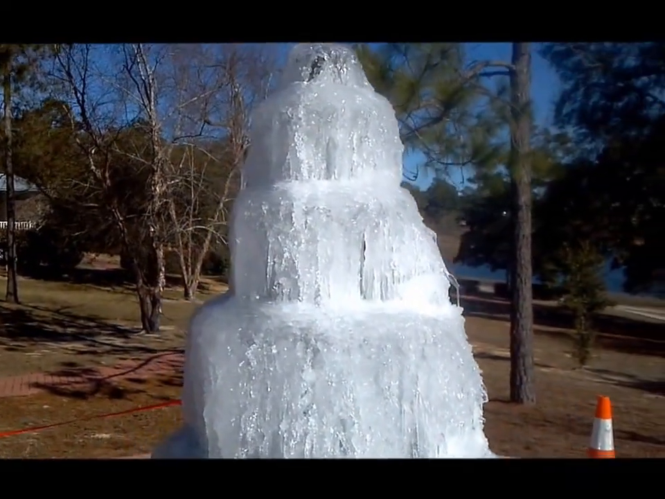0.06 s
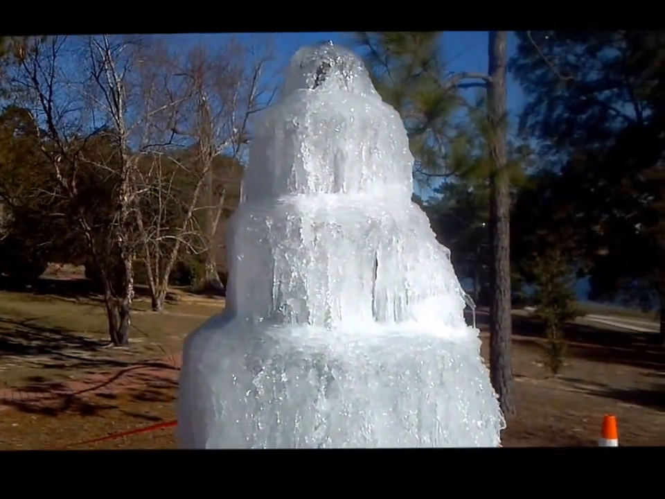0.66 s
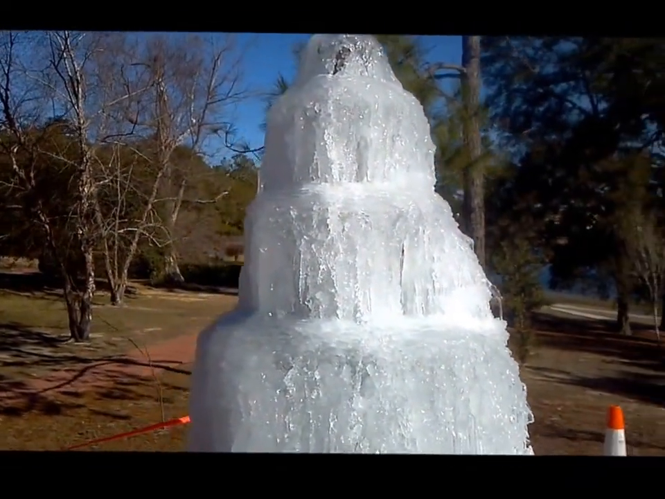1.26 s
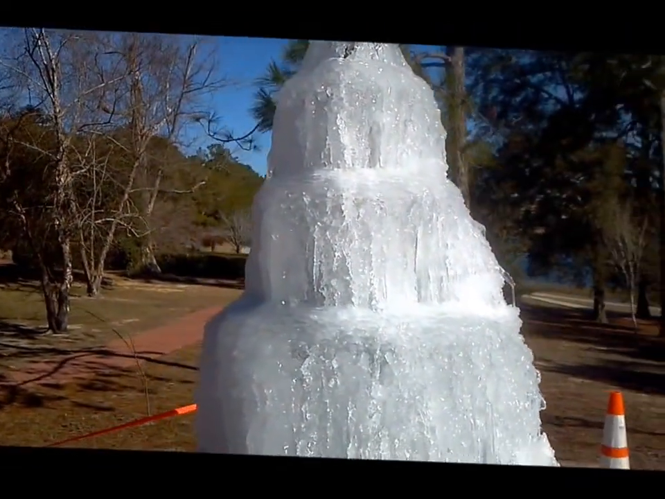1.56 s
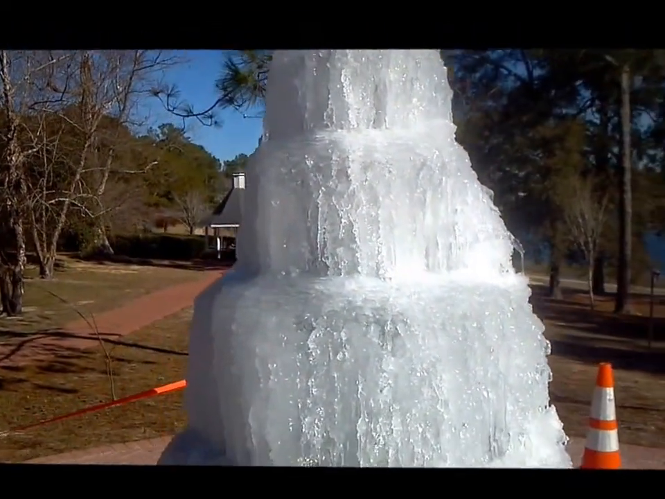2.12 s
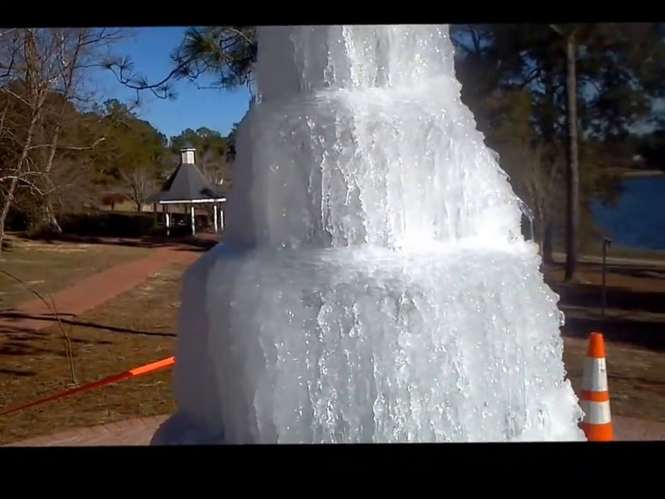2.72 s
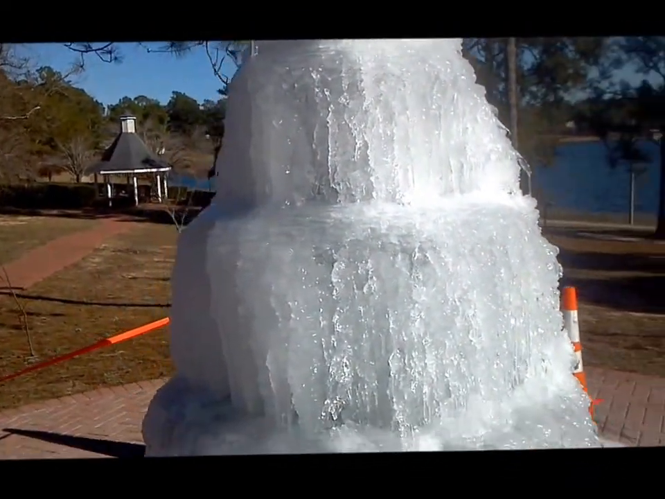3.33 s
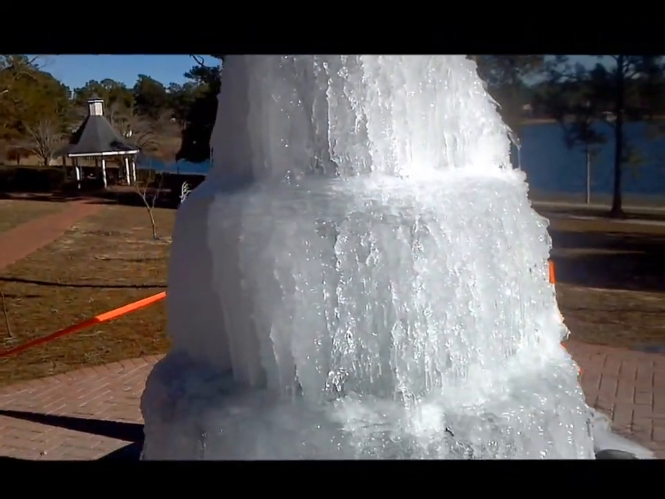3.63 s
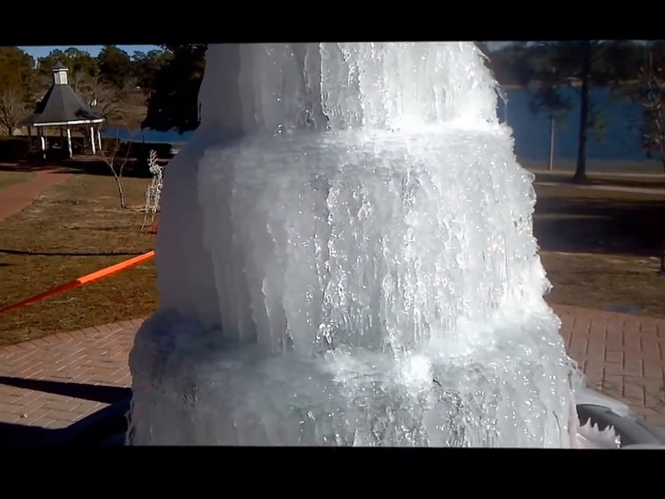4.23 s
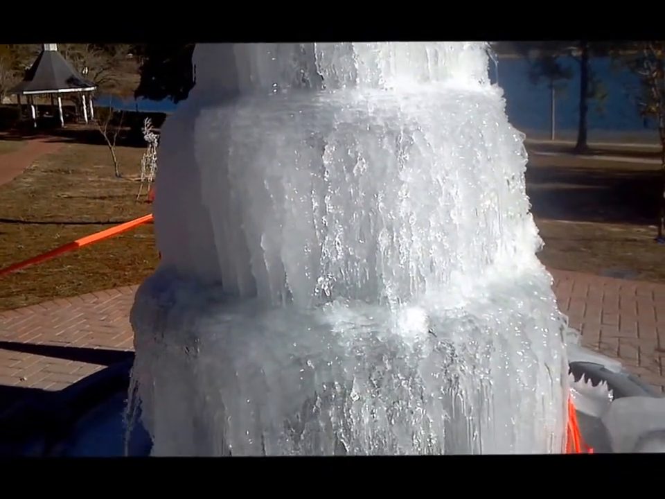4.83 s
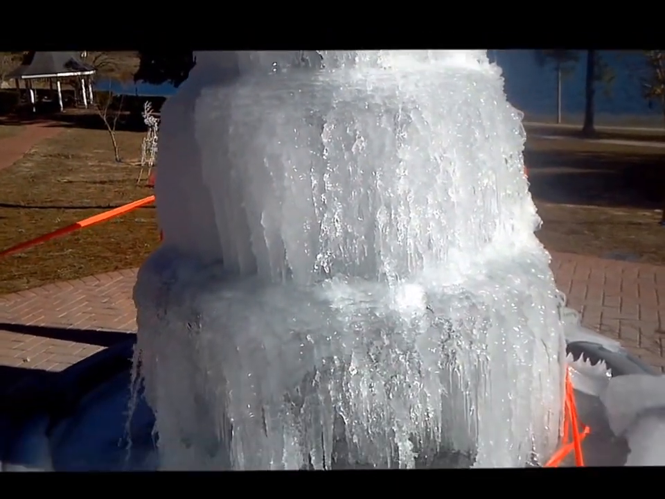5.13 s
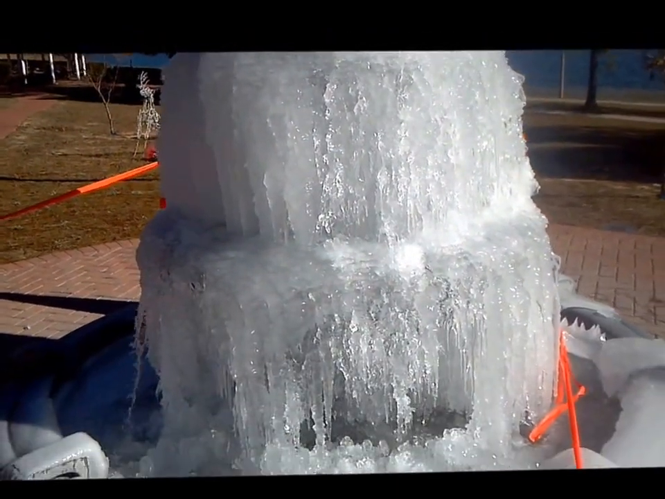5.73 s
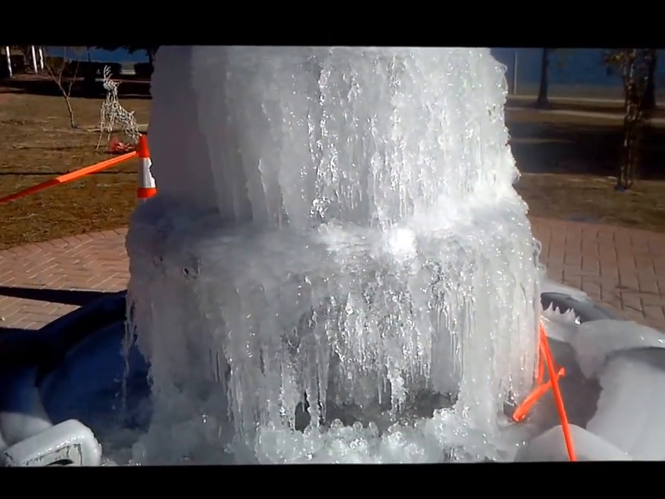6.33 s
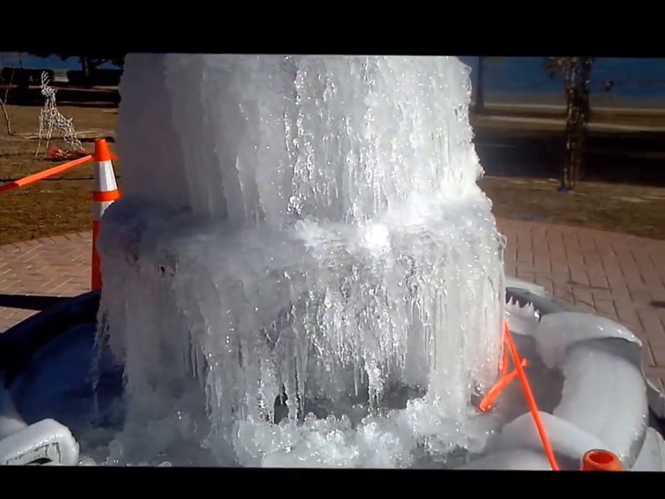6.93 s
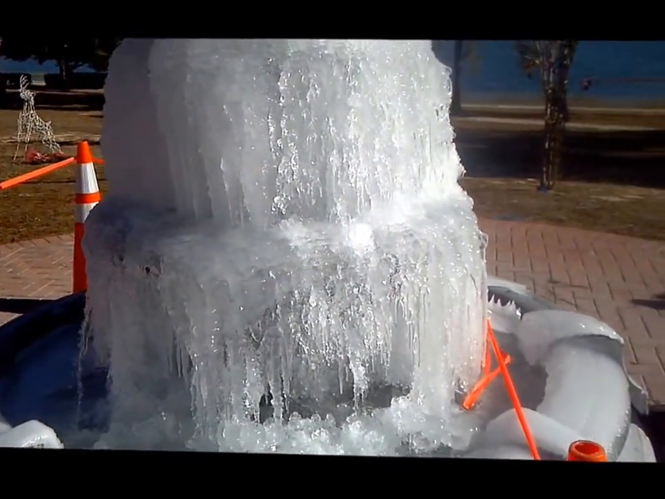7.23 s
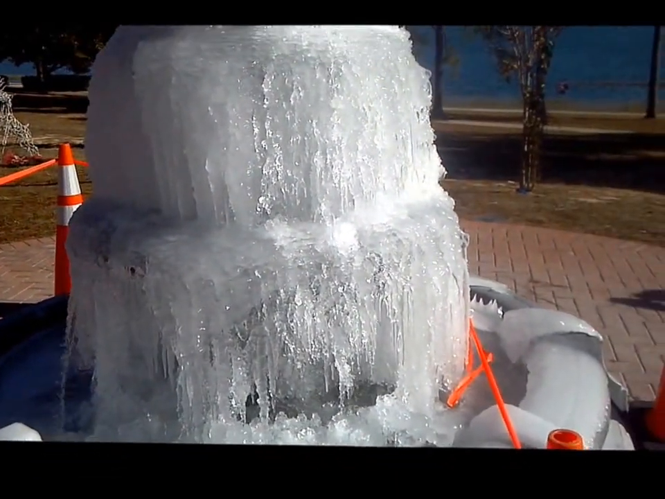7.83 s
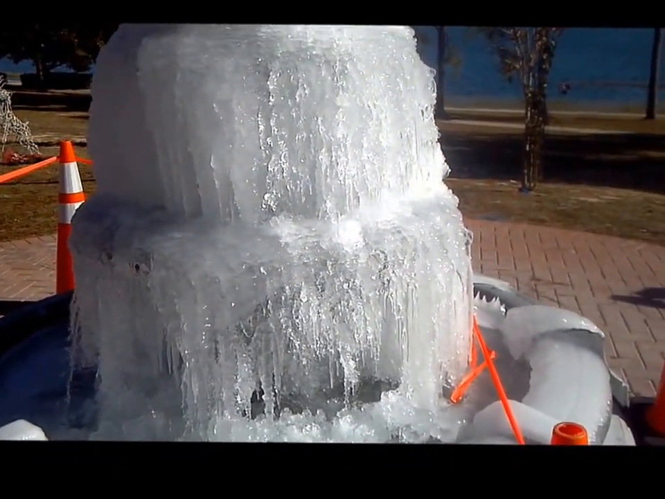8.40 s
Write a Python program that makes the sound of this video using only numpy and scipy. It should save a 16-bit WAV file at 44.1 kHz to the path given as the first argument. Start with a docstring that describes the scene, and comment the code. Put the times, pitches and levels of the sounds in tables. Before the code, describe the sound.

Outdoors, close to a frozen fountain, fine spray patters on ice and thin streams splash and gurgle into the basin without a break. Nearby drops snap now and then. Low, uneven wind noise hits the microphone in repeated gusts with short thumps, growing stronger through the first two thirds. It then drops to lighter puffs while the water carries on with occasional hollow plops.

```python
"""Iced-over park fountain in gusty wind

Water runs down the frozen tiers: spray patters on the ice, drops snap close by, and streams gurgle
into the basin. The microphone is on a hand-held camera that tilts from the top down to the basin while
gusts buffet its two ports. The camera widens its stereo by subtracting from each port a delayed copy
of the other; its limiter ducks the water after each hard buffet."""
import sys
import numpy as np
from scipy import signal
from scipy.fft import rfft, irfft, next_fast_len
from scipy.io import wavfile
from scipy.ndimage import uniform_filter1d

SR = 44100
rng = np.random.default_rng(int(sys.argv[2]) if len(sys.argv) > 2 else 0)


def waveform_to_disk(signal):
    """Save audio, clipped to [-1, 1], as 16-bit WAV at the path in sys.argv[1]."""
    frames = np.transpose(np.atleast_2d(signal))
    scaled = np.clip(frames, -1, 1) * 32767
    samples = np.round(scaled).astype(np.int16)
    wavfile.write(sys.argv[1], SR, samples)


N = 377496

# Levels in the tables are relative; each source adds its own gain.
# loudness of the falling water at the microphone: time_s, level_db
WATER_LEVEL = [(0, -41), (.4, -42.5), (.6, -40), (1.4, -39.5), (2.1, -39.5), (2.6, -38.5), (3.7, -39.5),
               (4.6, -40.5), (5.3, -40.5), (6, -42), (7.6, -41.5), (8.56, -38.5)]
# where the camera points: time_s, tilt (0 = upper tiers, 1 = basin)
CAMERA_TILT = [(3, 0), (4.3, 0.78), (6, 0.97)]
# colour of the spray on the upper tiers: frequency_hz, gain_db
TIER_SPRAY_COLOUR = [(700, -12), (1800, 1.5), (2400, -8.0), (2900, -2.5), (3600, -3.0), (4200, -7.0),
                     (4800, -8.5), (5500, -5.5), (7200, -2.0), (8500, -6.5), (9800, -4.5), (11000, -5.0),
                     (12700, -13.0), (14000, -9.5), (15400, -11.0)]
# colour of the spray at the basin: frequency_hz, gain_db
BASIN_SPRAY_COLOUR = [(700, -12), (1800, 1), (2400, -6.0), (2900, -7.0), (3650, -1.0), (4800, -4.5),
                      (5500, -7.5), (7300, 0.8), (8900, -7.5), (9900, -4.5), (11000, -5.5), (12700, -11.0),
                      (14000, -8.5), (15400, -6.0)]
# bands of the spray that flicker separately: centre_hz
SPRAY_BANDS_HZ = [1800, 3000, 3700, 4400, 5800, 6600, 7400, 9500, 14000]
# colour of the streams landing on ice and water: frequency_hz, tier_db, basin_db
STREAM_COLOUR = [(39.8, -3, -5), (149, 7, 9.5), (250, -4, -1), (390, 14, 1.5), (520, 4, 2),
                 (740, -1.5, -13), (1100, 1.5, -5), (1380, -25, -47), (1930, 4.5, 2), (2330, -23, -40),
                 (3820, -3.5, -3), (9100, -8.5, -42)]
# hollows under the ice that the streams ring: pitch_hz, width_hz, tier_db, basin_db
ICE_HOLLOWS = [(548.5, 48.4, -1.5, -1), (659.5, 48, -10.5, -10), (815, 185, -12.5, -7),
               (998, 81, -16, -9.5), (1154, 75, -9, -24.5), (2125, 57, -12.5, -14)]
# gusts on the microphone: peak_s, half_width_s, level_db
WIND_GUSTS = [(0.0, 0.04, -19.5), (.22, 0.39, -27.5), (.62, 0.17, -25), (1.25, 0.27, -25.5),
              (1.77, 0.21, -24.5), (2.3, 0.081, -23.5), (2.62, 0.14, -21.5), (2.92, 0.12, -21.5),
              (3.23, 0.12, -22), (3.452, 0.093, -16), (3.75, 0.058, -30), (4.003, 0.048, -20.5),
              (4.93, 0.074, -17.5), (5.224, 0.071, -15), (5.5, 0.095, -21), (5.92, 0.11, -26.5),
              (6.349, 0.083, -34.5), (6.55, 0.095, -22.5), (7.14, 0.03, -30), (7.39, 0.17, -28),
              (8.03, 0.067, -28), (8.342, 0.12, -25.5)]
# the hardest eddies in the gusts: peak_s, level_db, corner_hz (before scaling by brightness)
EDDIES = [(0.253, -17.5, 375), (0.616, -19, 433), (0.658, -22, 406), (1.072, -24.5, 422),
          (1.179, -25.5, 480), (1.215, -28, 490), (1.352, -26.5, 398), (1.49, -20.5, 377),
          (1.521, -10, 440), (1.652, -23, 526), (1.663, -18, 500), (2.309, -24.5, 485), (2.337, -27.5, 520),
          (2.442, -19, 247), (2.468, -15.5, 258), (2.52, -17, 253), (2.568, -20.5, 270), (2.598, -15, 320),
          (2.66, -23, 330), (2.692, -18, 228), (2.718, -13.5, 264), (2.752, -18.5, 287),
          (2.848, -15.5, 386), (2.867, -15.5, 470), (2.969, -10.5, 274), (3.404, -14.5, 430),
          (3.42, -12, 340), (3.448, -12.5, 565), (3.503, -19, 288), (3.978, -25, 370), (4.002, -12.5, 390),
          (4.031, -17, 366), (4.898, -13, 206), (4.932, -18.5, 330), (4.957, -8.5, 340), (4.98, -13, 270),
          (5.012, -15.5, 231), (5.197, -17, 684), (5.212, -12, 402), (5.229, -19, 450), (5.289, -15, 480),
          (5.302, -13, 532), (5.404, -18.5, 322), (5.497, -14.5, 290), (5.529, -16, 213), (5.625, -22, 304),
          (5.701, -25.5, 295), (6.497, -27, 412), (6.534, -15, 366), (8.017, -27.5, 417), (8.061, -23, 233),
          (8.371, -28, 290), (8.422, -24, 313)]
# sharp drops close to the microphone: start_s, level_db, pitch_hz, snap_decay_s
NEAR_DROPS = [(.389, -24, 6800, .0015), (.482, -25.5, 6860, 0.0017), (0.7803, -25, 7150, 0.0028),
              (.852, -27, 7060, .0012), (.938, -25, 3580, .0015), (1.144, -24, 6980, .002),
              (1.434, -23, 10000, .001), (1.818, -14, 7660, 0.0013), (1.912, -20.5, 8600, .0012),
              (2.06, -17, 7060, .0007), (2.6626, -16, 10000, .0007), (2.822, -21.5, 9300, .0015),
              (3.056, -20, 6610, 0.0014), (3.1768, -20, 9500, 0.0028), (3.744, -23, 6820, 0.0039),
              (3.813, -20, 5480, 0.0017), (4.035, -22.5, 3720, 0.00089), (4.304, -19.5, 6940, 0.0018),
              (4.323, -23, 5750, 0.0013), (4.932, -22, 6950, 0.00092), (5.479, -22, 12000, 0.00091),
              (5.7596, -21, 6400, 0.0013), (6.282, -23, 6700, 0.003), (6.348, -21, 3740, 0.0011),
              (6.67, -26, 7460, 0.00084), (6.94, -22, 6600, .0015), (7.09, -24.5, 4220, 0.0027),
              (7.457, -26, 7300, .001), (8.3, -24.5, 4020, 0.0014)]
# gobs of water bursting on the ledges: start_s, level_db, pitch_hz, decay_s
LEDGE_SPLASHES = [(0.598, -31.5, 1910, .01), (1.3284, -31.5, 1510, 0.0085), (2.001, -23, 1210, 0.0052),
                  (2.725, -14, 1250, .003), (2.816, -21, 1160, 0.0047), (2.947, -25.5, 1500, 0.0047),
                  (5.903, -32, 1600, 0.0057), (7.456, -32, 1130, 0.0058)]
# the largest bubbles, near the pitches of the hollows: start_s, level_db, pitch_hz
LARGE_BUBBLES = [(1.754, -21, 560), (3.705, -21, 563), (4.483, -24.5, 527), (4.608, -22, 528),
                 (5.14, -16, 566), (5.778, -28, 531), (5.872, -30, 550), (5.986, -26, 575),
                 (6.649, -21, 556), (6.965, -24, 540), (7.093, -25.5, 547), (7.404, -28.5, 1053),
                 (7.685, -26, 550), (7.971, -20, 562), (8.132, -21, 534), (8.335, -24, 1040),
                 (8.481, -28, 546)]
# how alike the water sounds at the two ports: frequency_hz, correlation (1 = identical)
PORT_LIKENESS = [(230, 1), (550, 0.88), (1000, 0.83), (1700, 0.24), (2300, 0), (3700, -.1), (4900, 0.01),
                 (7000, 0.48), (9500, -.15), (16000, -.1)]

FFT_SIZE = next_fast_len(N, real=True)
TIME, FREQ = np.arange(N) / SR, np.fft.rfftfreq(FFT_SIZE, 1 / SR)


def gain_of(db):
    """Decibels to amplitude."""
    return 10 ** (np.asarray(db) / 20)


def unit_rms(x):
    """Scales to rms 1."""
    return x / np.sqrt(np.mean(x ** 2) + 1e-20)


def over_time(rows):
    """Joins rows of time_s, value by straight lines."""
    return np.interp(TIME, *np.transpose(rows))


def over_frequency(rows):
    """Joins rows of frequency_hz, value on a log-frequency axis."""
    hz, value = np.transpose(rows)
    return np.interp(np.log(FREQ + 1), np.log(hz + 1), value)


def coloured(x, gain):
    """Filters by one gain per frequency, to rms 1."""
    return unit_rms(irfft(rfft(x, FFT_SIZE) * gain, FFT_SIZE)[..., :N])


def wander(hz):
    """Random drift of rms 1, mostly slower than hz."""
    return coloured(rng.standard_normal(N), 1 / (1 + (FREQ / hz) ** 2))


def add(mix, start_s, sound):
    """Mixes a two-channel sound in at start_s."""
    part = mix[:, max(round(start_s * SR), 0):][:, :sound.shape[1]]
    part += sound[:, :part.shape[1]]


def at_ports(x):
    """Long waves reach both microphone ports alike, short ones differently."""
    likeness = np.clip(over_frequency(PORT_LIKENESS), -1, 1)
    common, apart = rfft(x, FFT_SIZE) * np.sqrt([1 + likeness, 1 - likeness])
    return unit_rms(irfft(np.array([common + apart, common - apart]), FFT_SIZE)[:, :N])


def aimed(tiers, basin):
    """Passes from the upper tiers to the basin as the camera tilts down."""
    tilt = np.clip(over_time(CAMERA_TILT), 0, 1)
    return (1 - tilt) * tiers + tilt * basin


def impacts(per_s, spread_db):
    """Two random trains of drop impacts, many small and a few large."""
    size = gain_of(spread_db * np.minimum(rng.exponential(1, (2, N)), 4.5))
    polarity = np.sign(rng.standard_normal((2, N)))
    lands = rng.random((2, N)) < per_s / SR
    return unit_rms(size * polarity * lands)


def splats(per_s, decay_s, spread_db):
    """Loudness envelope of blobs of water that land at once and die away."""
    when, size = rng.random((round(per_s * N / SR), 2)).T
    energy = np.bincount((when * N).astype(int), gain_of(-spread_db * np.log(size + .04)) ** 2, N)
    return unit_rms(np.sqrt(signal.lfilter([1], [1, -np.exp(-2 / (decay_s * SR))], energy)))


def spray(level_db=0.24, clump_share=0.19, swell_db=0.85, swell_hz=11, low_cut_hz=900):
    """Fine drops sizzle on the ice in clumps over a smooth mist; each splat favours its own pitch."""
    drops = at_ports(impacts(per_s=14000, spread_db=3) + rng.standard_normal((2, N)))
    spectrum, patter = rfft(drops, FFT_SIZE), 0
    for weights, hz in zip(np.eye(len(SPRAY_BANDS_HZ)), SPRAY_BANDS_HZ):
        band = irfft(spectrum * np.interp(FREQ, SPRAY_BANDS_HZ, weights), FFT_SIZE)[:, :N]
        blob_share = np.interp(hz, [4000, 7000, 10000], [.5, .36, .2])  # higher bands are smoother
        blobs = splats(per_s=55, decay_s=.006, spread_db=3)
        patter = patter + band * unit_rms(1 - blob_share + blob_share * blobs)
    clumps = splats(per_s=90, decay_s=.0064, spread_db=3.5)
    swell = gain_of(swell_db * wander(swell_hz))
    patter = patter * swell * (1 - clump_share + clump_share * clumps)
    low_cut = FREQ ** 2 / (FREQ ** 2 + low_cut_hz ** 2)
    tiers = coloured(patter, low_cut * gain_of(over_frequency(TIER_SPRAY_COLOUR)))
    basin = coloured(patter, low_cut * gain_of(over_frequency(BASIN_SPRAY_COLOUR)))
    return gain_of(level_db) * aimed(tiers, basin)


def streams(tier_splash_db=-4.8, basin_splash_db=-8.2, hollow_db=-3.8):
    """Ropes of water land in uneven surges, and trapped air rings the hollows in short notes."""
    surges = .65 + splats(per_s=65, decay_s=.018, spread_db=2.9)
    slaps = at_ports(impacts(per_s=2500, spread_db=2.5)) * surges
    colour = np.array(STREAM_COLOUR)
    tiers = coloured(slaps, gain_of(over_frequency(colour[:, [0, 1]])))
    basin = coloured(slaps, gain_of(over_frequency(colour[:, [0, 2]])))
    out = aimed(gain_of(tier_splash_db) * tiers, gain_of(basin_splash_db) * basin)
    for hz, width_hz, tier_db, basin_db in ICE_HOLLOWS:
        resonance = 1j * FREQ * width_hz / (hz ** 2 - FREQ ** 2 + 1j * FREQ * width_hz)
        skirt = 1 / (1 + ((FREQ - hz) / (3 * width_hz)) ** 2)
        trapped_air = splats(per_s=45, decay_s=.014, spread_db=2.6)
        notes = coloured(slaps * trapped_air, resonance * skirt)
        out = out + gain_of(hollow_db + aimed(tier_db, basin_db)) * notes
    return out


def bubbles(level_db, low_hz, high_hz, per_s, decay_cycles, spread_db, glide, pitches=40):
    """Small bubbles of many sizes each ring briefly, rising slightly in pitch."""
    out = np.zeros((2, N))
    for hz in np.geomspace(low_hz, high_hz, pitches):
        age = np.arange(round(5 * decay_cycles * SR / hz)) * hz / SR / decay_cycles  # in decay times
        envelope = (1 - np.exp(-8 * age)) * np.exp(-age)
        ring = envelope * np.sin(2 * np.pi * decay_cycles * age * (1 + glide * age / 2))
        for when, size, side in rng.random((round(per_s * N / SR / pitches), 3)):
            # a bubble off to one side reaches one port a little sooner
            pair = np.array([np.roll(ring, round(4 * side)), np.roll(ring, round(4 * (1 - side)))])
            add(out, when * N / SR, gain_of(-spread_db * np.log(size + .05)) * pair)
    return gain_of(level_db) * unit_rms(out)


def wind_db(draught_db=-51.5, roundness=1.16):
    """Strength of the wind: each gust swells to a fairly pointed peak and dies to a faint draught."""
    power, t = gain_of(draught_db) ** 2, TIME[::32]
    for peak_s, half_width_s, db in WIND_GUSTS:
        outline = np.exp(-np.minimum(abs(t - peak_s) / half_width_s, 10) ** roundness)
        power = power + (gain_of(db) * outline) ** 2
    return np.interp(TIME, t, 10 * np.log10(power))


def turbulence(hz, corner_hz, slope=3.4, low_cut_hz=106):
    """Spectrum of wind pressure: falls above the eddy's corner, thinned below by the microphone."""
    low_cut = ((hz / low_cut_hz) ** 3 + .05) / np.sqrt(1 + (hz / low_cut_hz) ** 6)
    return low_cut / np.sqrt(1 + (hz / corner_hz) ** (2 * slope))


def wind_rumble(level_db=0.5, calm_hz=195, gust_hz=295, lump_db=5, lump_hz=35, flutter_db=4):
    """Wind on the microphone: a lumpy rumble, unrelated at the two ports, brighter as it rises."""
    strength_db = wind_db() + flutter_db * np.tanh(wander(hz=10))
    push = rng.standard_normal((2, N)) * gain_of(lump_db * np.tanh([wander(lump_hz), wander(lump_hz)]))
    calm, gusty = (coloured(push, turbulence(FREQ, hz)) for hz in (calm_hz, gust_hz))
    gust_share = np.interp(strength_db, [-36, -18], [0, 1])
    return gain_of(strength_db + level_db) * ((1 - gust_share) * calm + gust_share * gusty)


def buffets(level_db=-5, width_s=0.0052, brightness=0.85, samples=4096):
    """Each eddy hits the ports with a short thump of turbulent pressure."""
    out, t = np.zeros((2, N)), (np.arange(samples) - samples // 2) / SR
    freq = np.fft.rfftfreq(samples, 1 / SR)
    for peak_s, db, corner_hz in EDDIES:
        push = rfft(rng.standard_normal((2, samples)) / (1 + (t / width_s) ** 2))
        # chance shapes the thump, the eddy's size sets its colour
        thump = unit_rms(irfft(push / abs(push) * turbulence(freq, corner_hz * brightness)))
        shared, opposed = thump / np.sqrt(2)
        add(out, peak_s + t[0], gain_of(db + level_db) * np.array([shared + opposed, shared - opposed]))
    return out


def near_drops(snap_db=-7, spatter_db=-11, spatter_s=0.0036, relative_width=0.12):
    """Drops close to the microphone snap on hard ice and spatter briefly around their own pitch."""
    out, t = np.zeros((2, N)), np.arange(SR // 30) / SR
    freq = np.fft.rfftfreq(len(t), 1 / SR)
    for start_s, db, hz, decay_s in NEAR_DROPS:
        snap_noise, spatter_noise = rfft(rng.standard_normal((2, 2, len(t))))
        broad_band = freq * hz / (freq ** 2 + hz ** 2)
        narrow_band = 1 / (1 + ((freq / hz - 1) / relative_width) ** 2)
        snap = unit_rms(irfft(snap_noise * broad_band)) * np.exp(-t / decay_s)
        spatter = unit_rms(irfft(spatter_noise * narrow_band)) * np.exp(-t / spatter_s)
        add(out, start_s, gain_of(db + snap_db) * snap + gain_of(db + spatter_db) * spatter)
    return out


def ledge_splashes(level_db=-1, rise_s=0.006, relative_width=0.18):
    """A gob of water bursts on a ledge and scatters in a short band of noise."""
    out, t = np.zeros((2, N)), np.arange(SR // 8) / SR
    freq = np.fft.rfftfreq(len(t), 1 / SR)
    for start_s, db, hz, decay_s in LEDGE_SPLASHES:
        envelope = (1 - np.exp(-t / rise_s)) * np.exp(-t / decay_s)
        band = 1 / (1 + ((freq / hz - 1) / relative_width) ** 4)
        burst = unit_rms(irfft(rfft(rng.standard_normal(len(t))) * band, len(t)))
        add(out, start_s, gain_of(db + level_db) * envelope * np.array([burst, burst]))
    return out


def gulps(level_db=-4.5, rise_s=.005, decay_s=0.016, unsteadiness=.5):
    """A large bubble swells and rings unsteadily in one soft plop."""
    out, t = np.zeros((2, N)), np.arange(SR // 8) / SR
    envelope = (1 - np.exp(-t / rise_s)) * np.exp(-t / decay_s)
    for start_s, db, hz in LARGE_BUBBLES:
        ring = envelope * np.sin(2 * np.pi * hz * t)
        add(out, start_s, gain_of(db + level_db) * np.array([ring, ring]))
    return out * (1 + unsteadiness * wander(hz=110))


def scene():
    """The fountain and the wind as pressure at the two microphone ports."""
    gurgle = bubbles(level_db=-15.5, low_hz=728.5, high_hz=2150, per_s=200,
                     decay_cycles=14.7, spread_db=5.5, glide=.0407)
    tinkle = bubbles(level_db=-13, low_hz=3000, high_hz=7500, per_s=300,
                     decay_cycles=14, spread_db=3.8, glide=.005)
    water = gain_of(over_time(WATER_LEVEL) + 0.5) * (spray() + streams() + gurgle + tinkle)
    return water + gulps() + ledge_splashes() + near_drops() + wind_rumble() + buffets()


def held(over_db, db_per_s):
    """Follows each rise at once and sinks back at a steady rate."""
    return np.maximum.accumulate(over_db + db_per_s * TIME) - db_per_s * TIME


def limiter(x, threshold_db=-15.5, window_s=0.017, attack_s=0.0037, slow_share=0.86):
    """Hard buffets turn the camera's gain down; a little returns quickly, the rest over seconds."""
    power = abs(uniform_filter1d((x ** 2).mean(0), round(window_s * SR)))
    over_db = np.maximum(10 * np.log10(power + 1e-12) - threshold_db, 0)
    dip_db = np.maximum(held(over_db, db_per_s=13), held(slow_share * over_db, db_per_s=3.5))
    lag = np.exp(-1 / (attack_s * SR))
    return x / gain_of(signal.lfilter([1 - lag], [1, -lag], dip_db))


def record(dry):
    """The camera widens the stereo image, limits the level and cuts the highest treble."""
    delay_samples, cutoff_hz = 17, 15800
    other_port = np.pad(dry[::-1], ((0, 0), (delay_samples, 0)))[:, :N]
    wide = (dry - other_port) / np.sqrt(2)
    low_pass = signal.firwin(511, cutoff_hz, window=("kaiser", 9), fs=SR)
    return signal.oaconvolve(limiter(wide), low_pass[None], "same")


dry = scene()
out = record(dry)
waveform_to_disk(out)
```